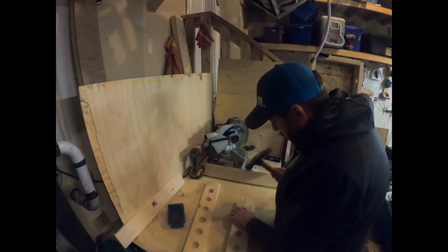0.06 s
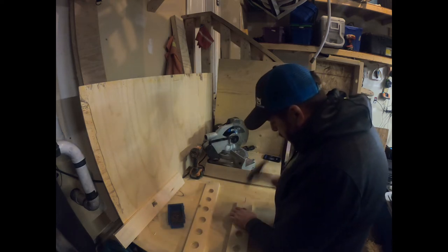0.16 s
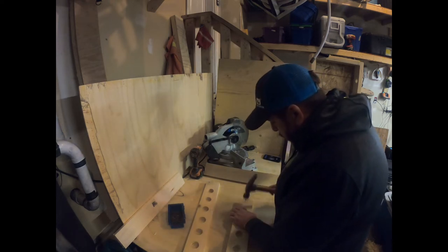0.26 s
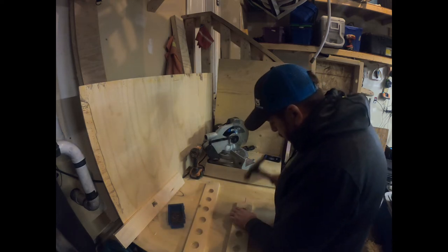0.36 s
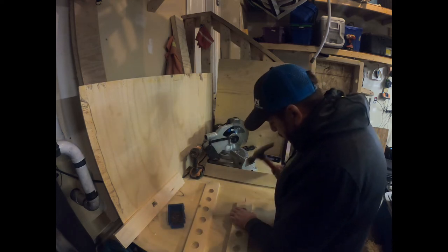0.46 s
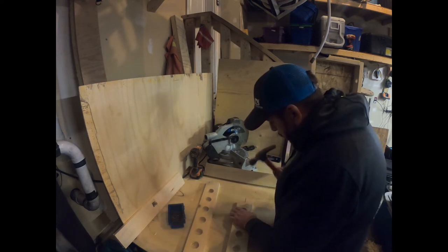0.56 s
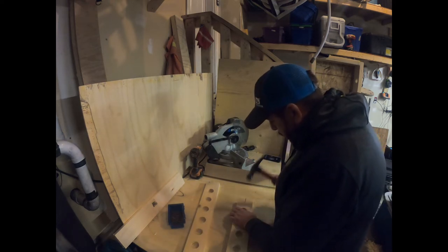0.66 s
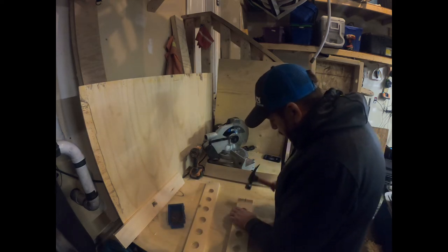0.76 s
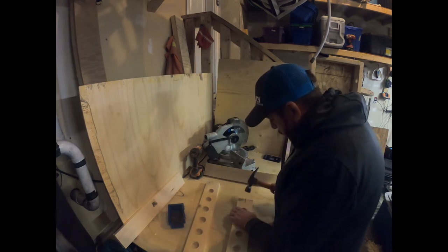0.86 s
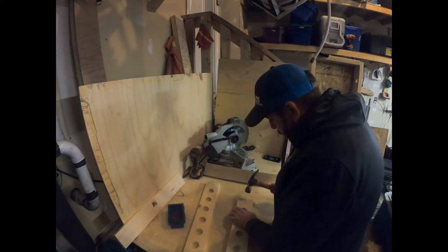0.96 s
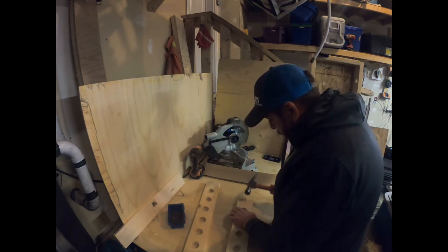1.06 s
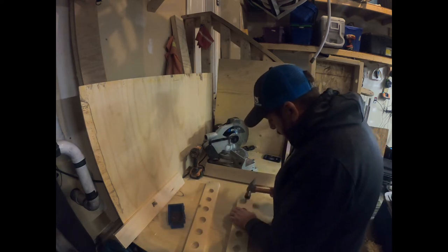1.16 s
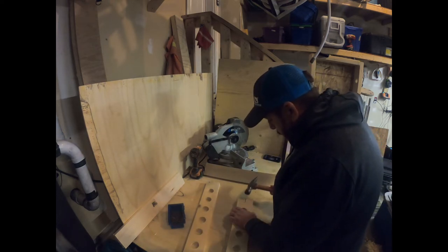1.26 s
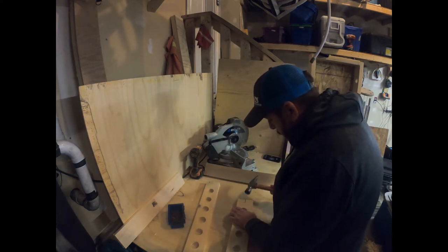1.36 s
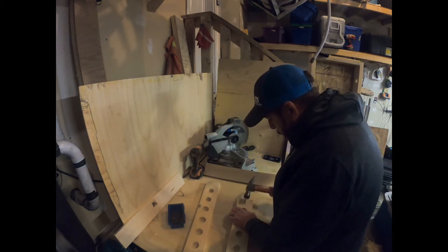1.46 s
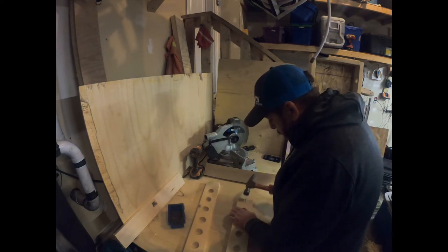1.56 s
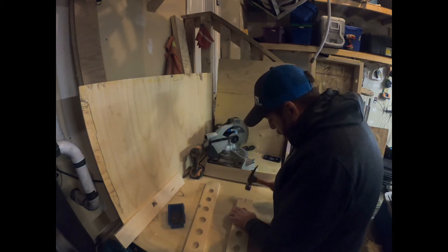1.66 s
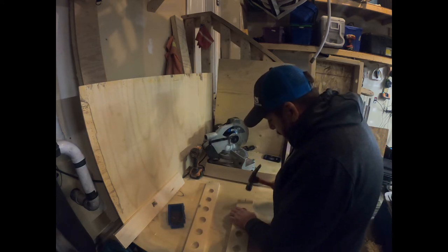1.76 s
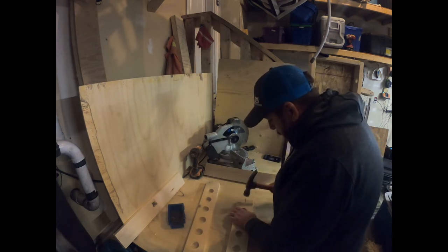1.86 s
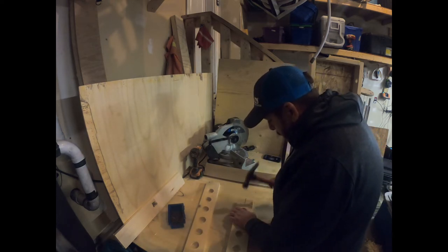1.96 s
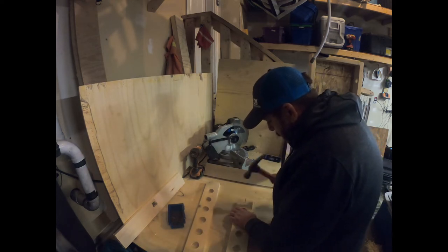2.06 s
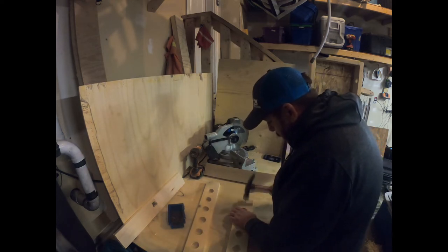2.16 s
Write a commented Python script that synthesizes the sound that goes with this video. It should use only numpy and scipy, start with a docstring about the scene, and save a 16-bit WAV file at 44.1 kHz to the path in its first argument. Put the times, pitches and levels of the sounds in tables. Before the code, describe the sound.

Hammer blows on a nailed board in a small workshop, the first loud with rattle, three softer after

```python
"""A hammer drives a nail into a board on a workbench in a small workshop: one heavy blow, three lighter ones.
Each blow sums the damped modes of crack, bench and singing nail with noise for dense wood and the room.
Thin noise ticks are heard, mostly just ahead of the blows; loose things thrown up by the heavy blow
rattle back as noise bursts.
Low decaying sines make the settling thuds and a panel's long hum, over steady, quiet air noise."""
import sys
import numpy as np
from scipy import signal
from scipy.io import wavfile

SR = 44100
rng = np.random.default_rng(int(sys.argv[2]) if len(sys.argv) > 2 else 0)


def store_pcm(level_fs):
    """Save levels as 16-bit WAV."""
    pcm = np.round(np.clip(level_fs, -1, 1) * 32767).astype(np.int16)
    wavfile.write(sys.argv[1], SR, np.atleast_2d(pcm).T)


N = 97020
T = np.arange(N) / SR
EDGES = 22 * 2 ** (np.arange(30) / 3)  # third-octave band edges [Hz]
CENTRES = np.sqrt(EDGES[1:] * EDGES[:-1])


def from_db(db):
    """Level: an amplitude ratio is ten to the power of dB / 20."""
    return 10 ** (np.asarray(db) / 20)


def at_hz(points, hz):
    """Interpolation on a log-frequency axis, on which equal steps are equal musical intervals."""
    table_hz, values = np.transpose(points)
    return np.interp(np.log(hz), np.log(table_hz), values)


def add(out, start_s, sound):
    """Superposition: a sound adds linearly to the mix from its start time."""
    first = min(int(start_s * SR), N - 1)
    part = sound[..., :N - first]
    out[:, first:first + part.shape[-1]] += part


def rise(seconds):
    """Smooth onset: a Gaussian approach to full strength."""
    return 1 - np.exp(-(T[:SR] / seconds) ** 2)


def contact():
    """Contact time: the force of an impact grows smoothly, not instantly."""
    return rise(0.00026)


def fade(t60):
    """Exponential decay: a fall of 60 dB in each t60, computed for one second."""
    return np.exp(-np.log(1000) * T[:SR] / np.reshape(t60, (-1, 1)))


# Likeness of the two channels of all noise: (frequency [Hz], left-right correlation, clipped to -1..1)
NOISE_CORRELATION = [(100, 1), (300, 0.97), (700, 0.8), (1400, 0.012), (2800, 1), (5500, 0.86),
                     (9000, -.15), (14000, -3)]
# Stereo balance of all noise: (frequency [Hz], left minus right [dB])
NOISE_BALANCE = [(200, 2), (700, -2.5), (1400, 1.2), (2500, -1.5), (5500, 3), (9000, 0.5), (14000, -0.5)]


def noise_bands(size):
    """Interaural correlation: mid and side noise mixed per third octave (bands x 2 x size)."""
    settling_samples = SR // 4  # dropped after filtering
    white = rng.standard_normal((2, 2, size + settling_samples)) * np.sqrt(SR / 2)  # unit power per Hz
    sides = np.array([[1], [-1]])
    bands = []
    for k, hz in enumerate(CENTRES):
        band_filter = signal.butter(2, EDGES[k:k + 2], "band", fs=SR, output="sos")
        # neighbouring bands draw on different noise
        mid, side = signal.sosfilt(band_filter, white[k % 2])[:, -size:]
        alike = np.clip(at_hz(NOISE_CORRELATION, hz), -1, 1)
        stereo = np.sqrt((1 + alike) / 2) * mid + np.sqrt((1 - alike) / 2) * side * sides
        bands.append(stereo * from_db(sides * at_hz(NOISE_BALANCE, hz) / 2))
    return np.array(bands)


def band_gains(spectrum, extra_db=0):
    """Spectral density: the level of each band read from a spectrum, as a column of gains."""
    return from_db(at_hz(spectrum, CENTRES) + extra_db)[:, None]


def burst(envelopes, bands):
    """Shaped noise: each noise band follows its own envelope after a smooth onset."""
    return np.einsum("bct,bt->ct", bands, envelopes) * contact()


# Reverberation time before the length factor: (frequency [Hz], t60 [s])
ROOM_T60 = [(50, 0.48), (110, 0.67), (170, .52), (300, .53), (500, 0.41), (1000, 0.4), (2500, 0.44),
            (5000, 0.38), (8500, .36), (12000, 0.13)]


def room(length=1):
    """Reverberation: a quick build-up of reflections, then decay at a rate set by frequency."""
    build_s = 0.0035
    return (1 - np.exp(-T[:SR] / build_s)) * fade(at_hz(ROOM_T60, CENTRES) * length)


def treble(hz):
    """High shelf: the share of a treble lift that reaches each frequency, half at 5 kHz."""
    return 1 / (1 + (5000 / hz) ** 4)


def colour_db(hz, thump, knock, crack, bright):
    """Excitation spectrum: how a blow weights bass, wooden knock, crack and treble."""
    thump_hz, knock_hz, crack_hz, width_octaves = 130, 890, 2376, 0.55
    low = 1 / (1 + (hz / thump_hz) ** 4)

    def bell(centre):
        return np.exp(-0.5 * (np.log2(hz / centre) / width_octaves) ** 2)

    return thump * low + knock * bell(knock_hz) + crack * bell(crack_hz) + bright * treble(hz)


def struck(modes, colour, length=1, size=SR):
    """Modal superposition: one impact starts many decaying sines together."""
    hz, db, t60 = np.transpose(modes)
    signs = (-1) ** np.arange(1, len(hz) + 1)  # neighbours start in opposite directions
    gains = from_db(db + colour_db(hz, *colour)) * signs
    sines = np.sin(2 * np.pi * hz[:, None] * T[:size])
    decays = np.exp(-np.log(1000) * T[:size] / (t60 * length)[:, None])
    return gains @ (sines * decays)


# Background noise: (frequency [Hz], density [dB per Hz])
AIR_SPECTRUM = [(30, -101), (65, -101), (105, -106), (160, -95.5), (300, -108), (480, -114), (640, -106),
                (900, -111), (1400, -118), (3000, -122), (6500, -125), (8200, -119), (10500, -133),
                (15500, -138)]


def air():
    """Stationary noise: quiet and steady, with a fixed spectral density."""
    return np.tensordot(band_gains(AIR_SPECTRUM)[:, 0], noise_bands(size=N), 1)


# Modes of a large panel: (frequency [Hz], level before the blow's weight [dB], t60 [s])
PANEL_MODES = [(154, -40.5, 1.5), (169.6, -56.5, 1.9), (205.6, -43, 1.1), (236, -51.5, 0.92),
               (314.28, -43, 0.23)]


def panel():
    """Low damping: the thump of each blow sets off a faint, long hum; an earlier one still sounds."""
    earlier_db = -25
    out = np.zeros((2, N))
    hum = struck(PANEL_MODES, np.zeros(4), size=N)
    for start_s, db, thump, *_ in BLOWS:
        add(out, start_s, from_db(db + thump) * hum)
    return out + from_db(earlier_db) * hum


# Dull thuds of board and bench: (time [s], level [dB], pitch [Hz])
THUDS = [(0.598, -44.5, 292), (0.724, -57.5, 227), (1.526, -30.5, 62), (1.573, -38.5, 66), (1.61, -41, 282)]


def settling():
    """Damped oscillation: board and bench settle with soft low bumps, each one decaying sine."""
    rise_s, t60_s = 0.0045, 0.1316
    out = np.zeros((2, N))
    shape = (1 - np.exp(-T[:SR] / rise_s)) * fade(t60_s)
    for start_s, db, hz in THUDS:
        add(out, start_s, from_db(db) * shape * np.sin(2 * np.pi * hz * T[:SR]))
    return out


# Loose things land on the bench: (time [s], level [dB], extra treble [dB])
LANDINGS = [(0.2614, -10, 6.5), (0.3030, 1.5, 2), (0.3099, 1, 0), (0.3153, 2.5, 8.5), (0.32, 3, -3.5),
            (0.49, -24, -35)]
# Spectrum before each landing's level: (frequency [Hz], density [dB per Hz])
LANDING_SPECTRUM = [(60, -52.5), (300, -47.5), (800, -51.5), (2500, -64), (4500, -64.5), (8600, -70.5),
                    (10500, -88.5), (15500, -103)]


def clatter():
    """Repeated impact: things thrown up by the heavy blow fall back as short noise bursts."""
    t60_s, room_db = 0.034, -13.5
    out = np.zeros((2, N))
    for start_s, db, bright in LANDINGS:
        gains = band_gains(LANDING_SPECTRUM, db + bright * treble(CENTRES))
        decay = fade(t60_s) + from_db(room_db) * room(length=0.84)
        add(out, start_s, burst(gains * decay, noise_bands(size=SR)))
    return out


# Small ticks, most just ahead of a blow: (time [s], level [dB], extra treble [dB])
TICKS = [(0.2362, 8, -24), (0.9290, -36, 0), (1.1655, -2, 8), (1.4854, 4.5, -0.5), (2.1858, 3, -23.5)]
# Spectrum before each tick's level: (frequency [Hz], density [dB per Hz])
TICK_SPECTRUM = [(60, -70.5), (170, -59), (330, -77.5), (650, -66.5), (1400, -74.5), (2600, -74),
                 (4000, -75.5), (5000, -83), (6300, -75.5), (7900, -81.5), (10000, -96.5), (12500, -106),
                 (15500, -111)]


def ticks():
    """Short noise bursts: thin ticks, mostly just ahead of a blow, each with a short reverberant tail."""
    t60_s, room_db = 0.02, -6.5
    out = np.zeros((2, N))
    tick_noise = noise_bands(size=SR)  # the same noise serves every tick
    decay = fade(t60_s) + from_db(room_db) * room(length=0.46)  # a shorter tail than a blow's
    for start_s, db, bright in TICKS:
        gains = band_gains(TICK_SPECTRUM, db + bright * treble(CENTRES))
        add(out, start_s, burst(gains * decay, tick_noise))
    return out


# Modes under the hammer head: (frequency [Hz], level before pan and blow [dB], t60 [s])
CRACK_MODES = [(232, -9, 0.062), (412.93, -15.5, .035), (618, -10.5, .028), (930.4, -22.5, .025),
               (1237.5, -18.5, 0.032), (1850, -5.5, 0.012), (2644, -2, 0.0084), (3127, -17, 0.015)]


def crack(colour):
    """Heavy damping and interaural delay: short modes of random phase, each leading at one ear."""
    rise_s, ear_lag_s = 0.0008, 0.00005  # the lag is the most either ear is shifted
    pan_db = -2  # left; the right ear gets the opposite
    hz, db, t60 = np.transpose(CRACK_MODES)
    phase, lag = rng.uniform(-1, 1, (2, len(hz), 1))
    ears = []
    for side in (-1, 1):
        ear_time = T[:SR] + side * ear_lag_s * lag
        ears.append(np.sin(2 * np.pi * hz[:, None] * ear_time + np.pi * phase) * fade(t60))
    gains = from_db(db + colour_db(hz, *colour))
    return gains @ np.array(ears) * rise(rise_s) * from_db([[pan_db], [-pan_db]])


# Hammer blows: (time [s], level [dB], extra thump [dB], extra knock [dB], extra crack [dB],
# extra treble [dB], ring length factor of bench and room, song of the nail re the blow [dB])
BLOWS = [(0.2481, 0, 2, 0.5, 1, 3.5, 0.97, -13.5), (1.1760, -14.5, -23, 8, -2.5, 9, 0.7, 1),
         (1.4924, -8.5, -16.5, -2.5, -1, 1, 0.67, -7.5), (2.1972, -15.5, -18, 4, 1.5, -2, 0.96, -12)]
# Modes of board and bench, before each blow's factors: (frequency [Hz], level [dB], t60 [s])
BENCH_MODES = [(47.204, -18.5, 0.23), (75.5, -12, 0.34), (101.2, -17.5, .4), (129.3, -22.5, 0.52),
               (175.8, -15.5, 0.36), (255.2, -26, 0.45), (273.4, -27.5, .62), (361, -28, 0.087),
               (475, -28.5, 0.46), (613.6, -27.5, 0.29), (737.6, -25, 0.22), (913, -27.5, .2),
               (1096, -29.5, 0.14), (1344, -42.5, 0.14), (1507, -34, .28), (1930, -34, 0.38),
               (2229.1, -33, 0.38), (2980, -37.5, .2)]
# Modes of the singing nail: (frequency [Hz], level before the blow's [dB], t60 [s])
SONG_MODES = [(1235, -29.5, 0.09), (1288, -17.5, .13), (4100, -46, 0.36), (6050, -45.5, .28),
              (6430, -45, 0.13), (8350, -46, 0.52)]
# Dense ring of the wood, before each blow's weight: (frequency [Hz], density [dB per Hz])
WOOD_SPECTRUM = [(40, -54), (180, -44.5), (400, -48.5), (700, -58), (1000, -59.5), (1500, -61), (2200, -56),
                 (3000, -61.5), (4000, -66), (5000, -71.5), (6300, -71.5), (8500, -69.5), (10500, -96),
                 (15500, -108)]
# The workshop's answer, before each blow's weight: (frequency [Hz], density [dB per Hz])
ROOM_SPECTRUM = [(30, -49), (70, -46), (170, -41.5), (320, -45), (650, -52), (1300, -52), (2500, -59),
                 (4000, -69.5), (5000, -82.5), (6300, -73), (8600, -75.5), (10500, -94.5), (15500, -109)]


def hammer():
    """Impact excitation: each blow cracks the board, rings bench and nail and fills the room."""
    wood_t60_s, song_delay_s, song_rise_s = 0.044, 0.025, 0.0026
    out = np.zeros((2, N))
    song = rise(song_rise_s) * struck(SONG_MODES, np.zeros(4))
    for start_s, db, *colour, length, song_db in BLOWS:
        tint = colour_db(CENTRES, *colour)
        wood = band_gains(WOOD_SPECTRUM, tint) * fade(wood_t60_s)
        reverberation = band_gains(ROOM_SPECTRUM, tint) * room(length)
        dense = burst(wood + reverberation, noise_bands(size=SR))
        bench = contact() * struck(BENCH_MODES, colour, length)
        add(out, start_s, from_db(db) * (crack(colour) + bench + dense))
        add(out, start_s + song_delay_s, from_db(db + song_db) * song)
    return out


def scene():
    """Superposition: all sources add over the quiet air."""
    return air() + panel() + settling() + clatter() + ticks() + hammer()


def record(dry):
    """Saturation and band limiting: peaks are rounded, then the top is cut."""
    top, cutoff_hz = 0.64, 16100
    rounded = top * np.tanh(dry / top)
    return signal.sosfilt(signal.cheby2(12, 70, cutoff_hz, fs=SR, output="sos"), rounded)


dry = scene()
out = record(dry)
store_pcm(out)
```